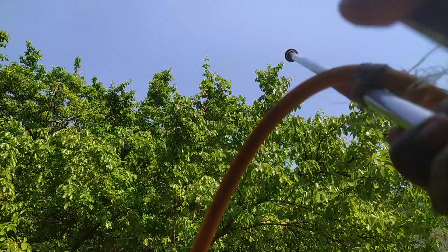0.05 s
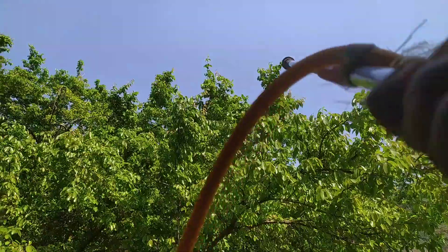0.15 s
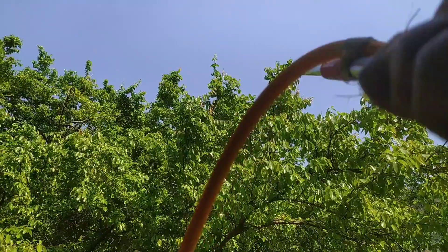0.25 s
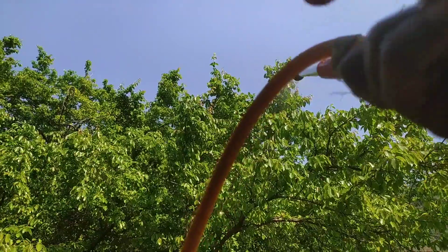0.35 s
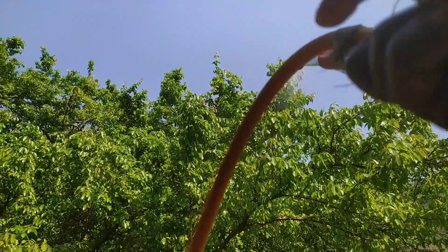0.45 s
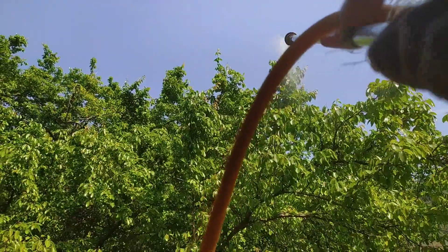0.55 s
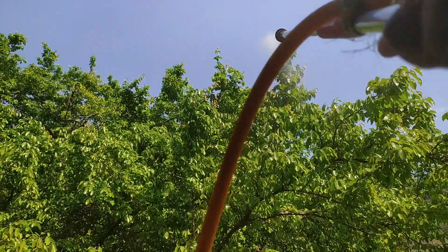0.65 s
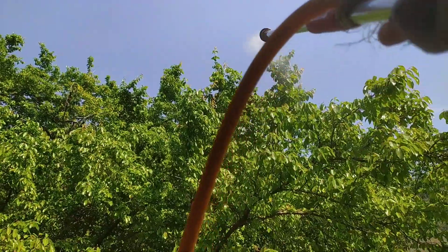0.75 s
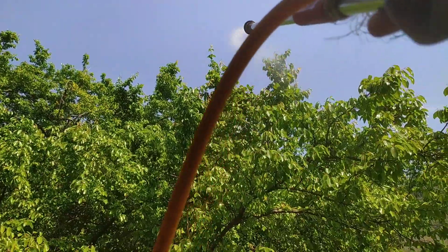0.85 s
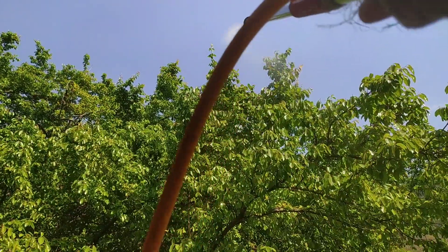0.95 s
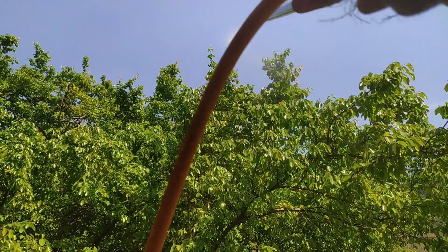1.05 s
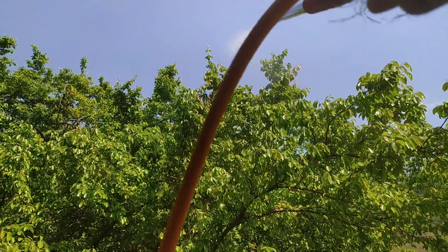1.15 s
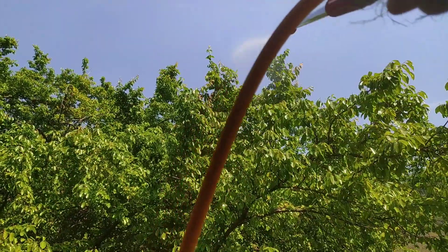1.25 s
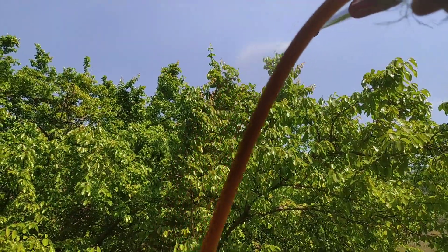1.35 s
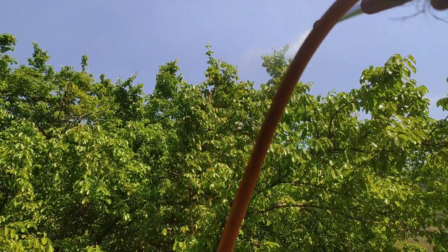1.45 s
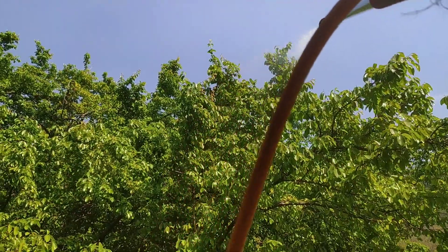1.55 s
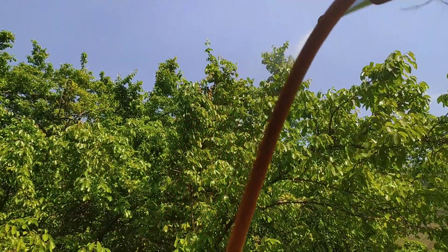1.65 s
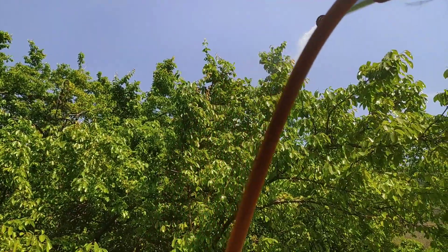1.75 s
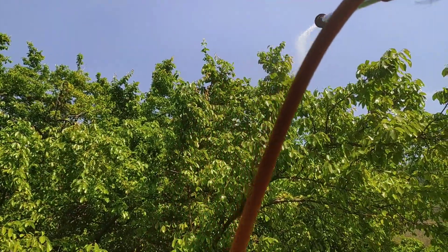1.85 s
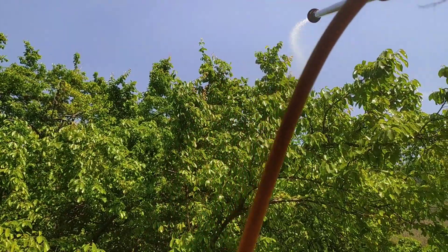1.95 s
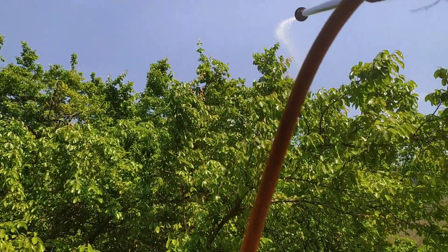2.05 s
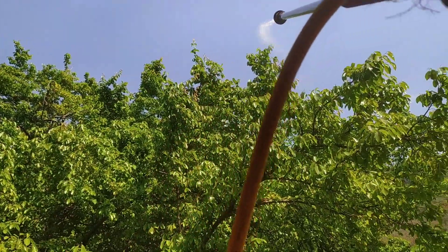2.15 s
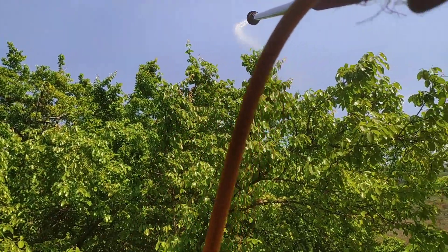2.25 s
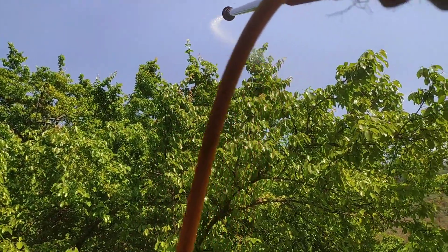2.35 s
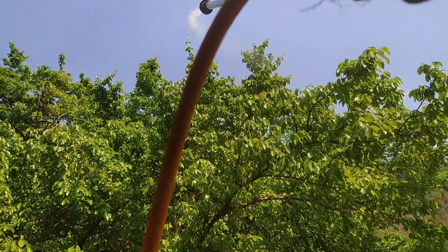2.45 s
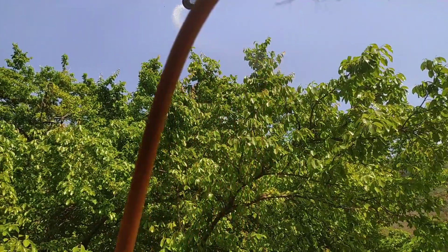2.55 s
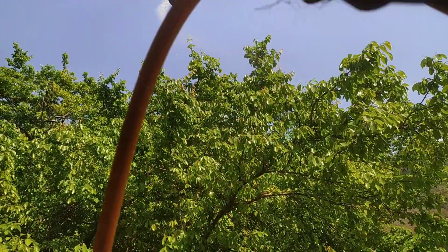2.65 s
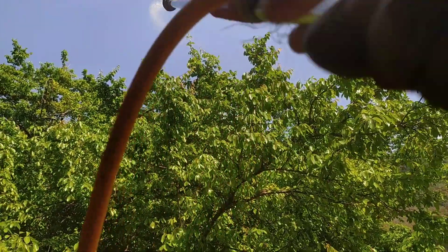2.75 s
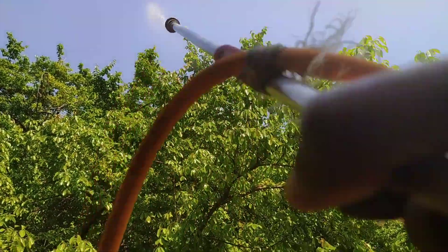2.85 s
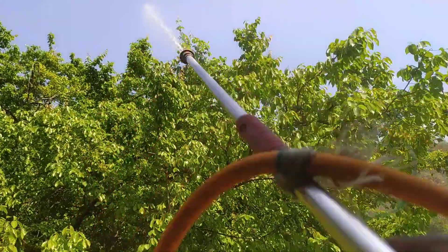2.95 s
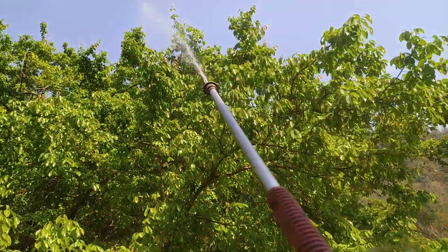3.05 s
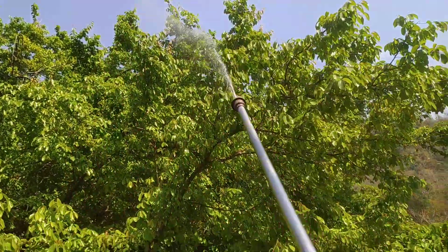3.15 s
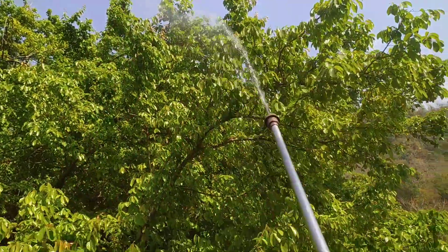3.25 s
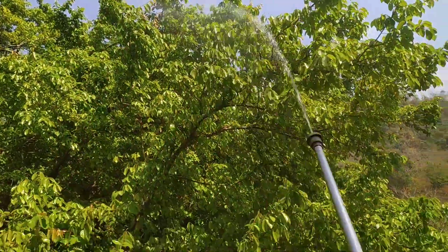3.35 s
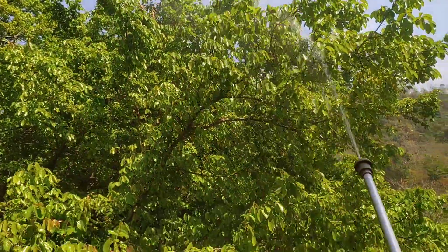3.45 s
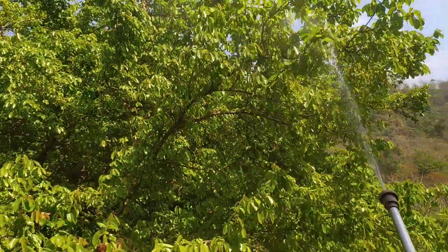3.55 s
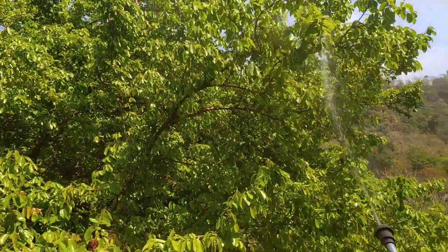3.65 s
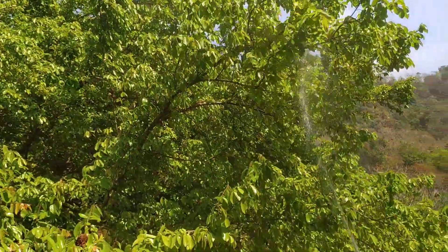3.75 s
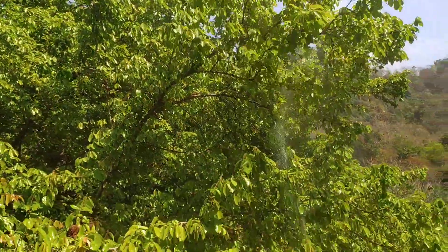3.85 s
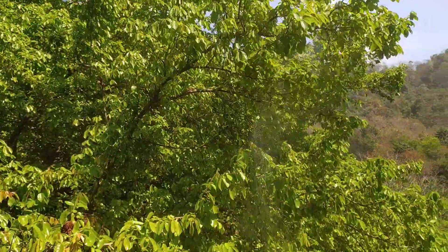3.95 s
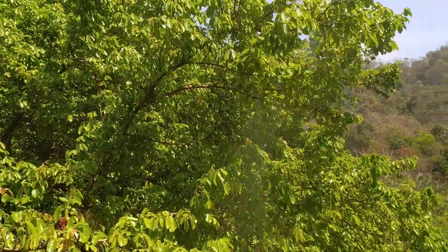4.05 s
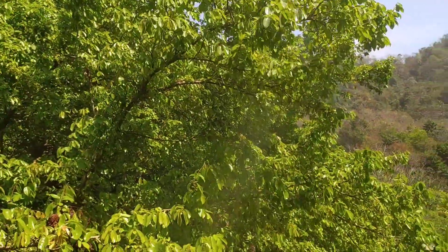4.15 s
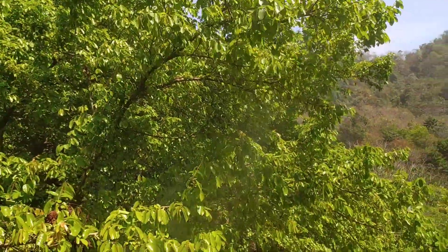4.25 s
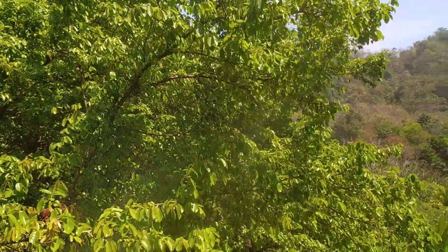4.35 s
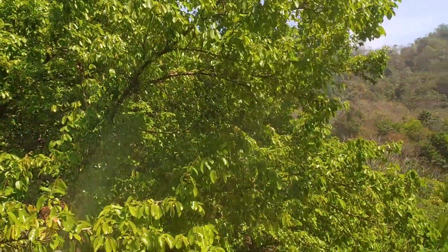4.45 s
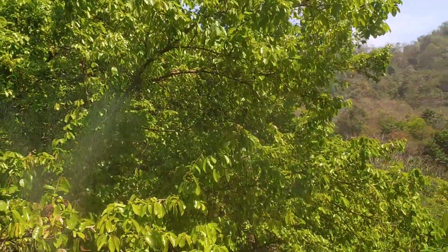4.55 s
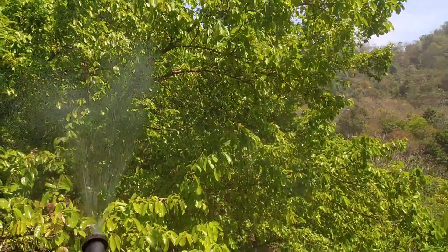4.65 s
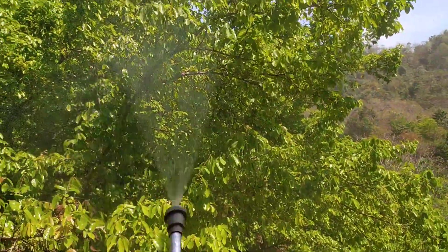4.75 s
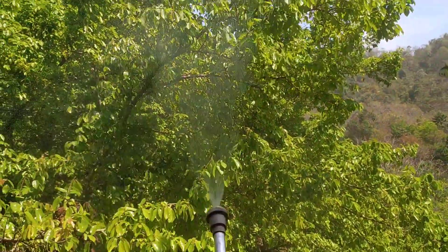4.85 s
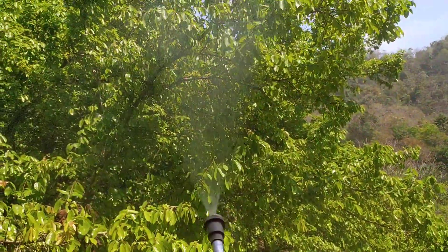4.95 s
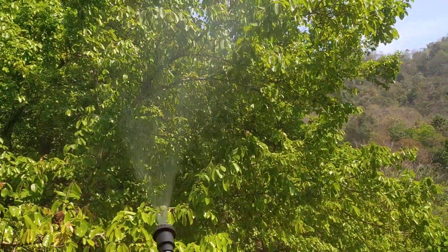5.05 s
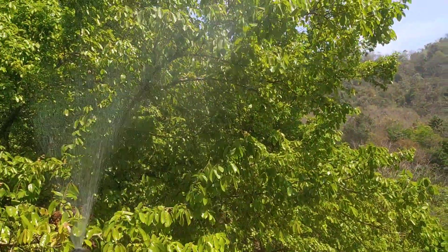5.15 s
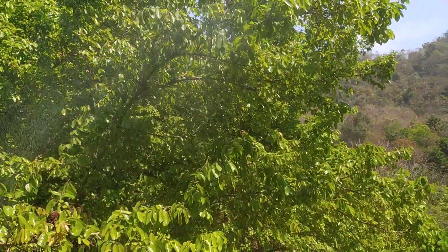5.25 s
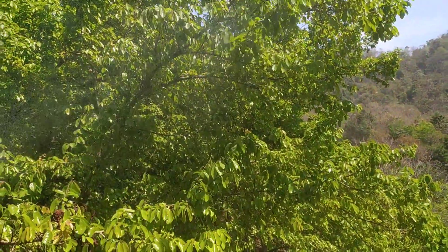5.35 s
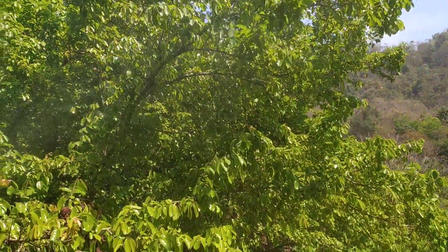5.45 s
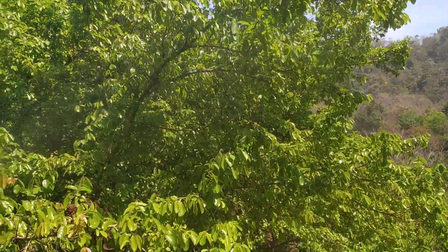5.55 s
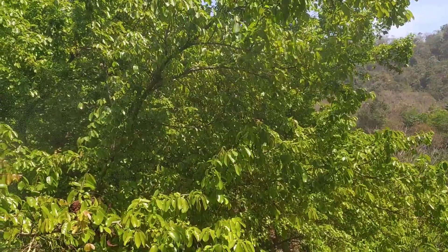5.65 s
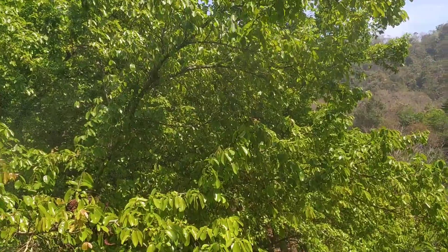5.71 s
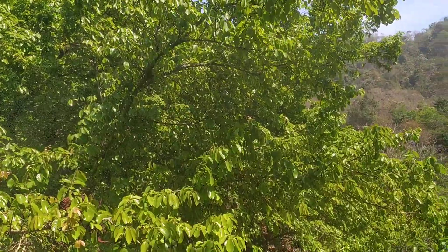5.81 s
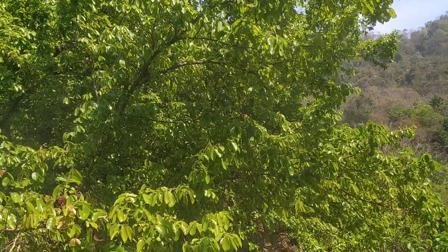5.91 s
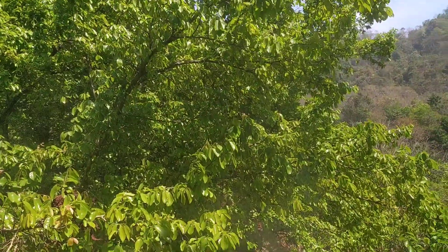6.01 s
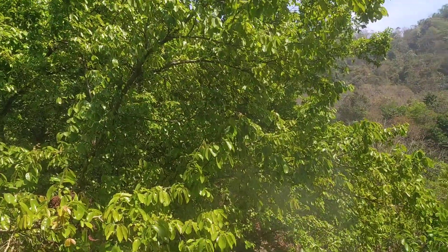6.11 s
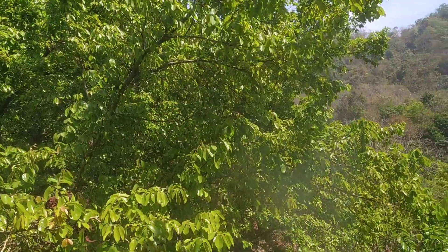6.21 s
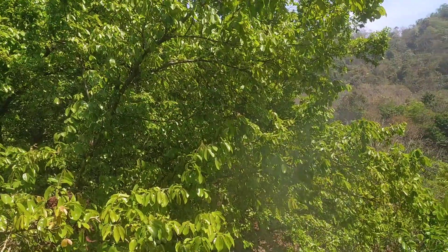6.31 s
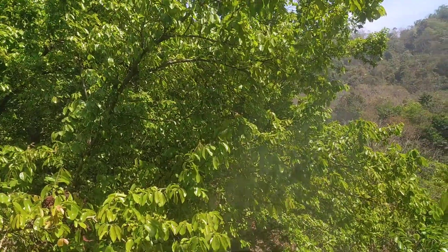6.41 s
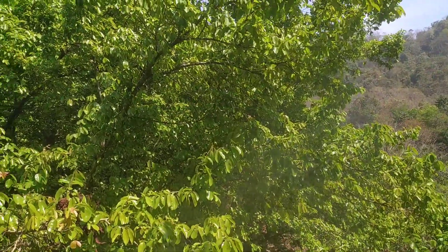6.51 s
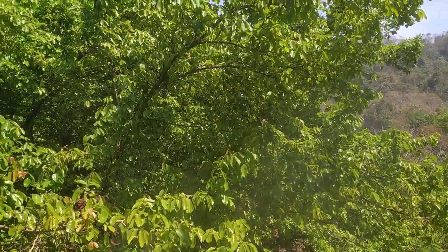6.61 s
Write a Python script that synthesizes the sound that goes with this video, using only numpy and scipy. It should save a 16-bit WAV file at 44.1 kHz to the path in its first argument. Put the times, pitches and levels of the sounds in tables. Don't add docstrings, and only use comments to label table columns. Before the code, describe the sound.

A pressure spray lance hisses and sputters outdoors among leafy trees, wavering side to side, then opens into a fuller, roaring mist near the end.

```python
import sys
import numpy as np
from scipy import signal
from scipy.fft import rfft, irfft, next_fast_len
from scipy.io import wavfile
from scipy.ndimage import uniform_filter1d

SR = 44100
rng = np.random.default_rng(int(sys.argv[2]) if len(sys.argv) > 2 else 0)


def invert_db(level):
    return 10 ** (np.asarray(level, dtype=float) / 20)


def generate_wav(signal):
    frames = np.transpose(np.atleast_2d(signal))
    scaled = np.clip(frames, -1, 1) * 32767
    pcm = np.round(scaled).astype(np.int16)
    wavfile.write(sys.argv[1], SR, pcm)


N = 294365
TIME_S = np.arange(N) / SR
HZ = np.fft.rfftfreq(next_fast_len(N), 1 / SR) + 1e-3

# time_s, gain_db
SCENE_CHANGE = [
    (0, 0),
    (.0257, 0),
    (.0262, -26),
    (.033, -26),
    (.038, -60),
    (.06, -60),
    (.074, 0),
    (6.7, 0),
]
# time_s, flow_db
VALVE = [
    (0, 0),
    (.05, -10),
    (.051, -41),
    (.1, -16.5),
    (.3, -10.5),
    (.33, -6.5),
    (.342, 2),
    (6.7, -0.5),
]
# time_s, left_port_lag_samples, clear_path_0_to_1.4 (past hand and hose)
SWING = [(.15, 4.1, 1), (.28, 3.2, 1), (.34, 4.5, .4), (.4, 5.4, 1.2), (.48, 4.8, 1.1), (.58, 5.8, .85),
         (.63, 4.8, .75), (.7, 3.7, .9), (.82, 3.5, 1.4), (.92, 2.9, 1), (1.05, 2.7, .9), (1.2, 3.1, 1.4),
         (1.3, 4, 1), (1.42, 4.7, 1), (1.6, 5.4, .8), (1.78, 5.3, .85), (1.86, 4.9, 1.3), (2.02, 4.9, 1.25),
         (2.1, 4.3, .85), (2.25, 3.5, 1.3), (2.35, 2.5, .9), (2.45, .7, 1), (2.9, -3, .5), (3.2, 1.5, .5),
         (3.4, 3.5, .7), (3.5, 3.9, .9), (3.58, 5.1, .95), (3.77, 5.1, .95), (3.87, 4, 1), (3.97, 4.5, .4),
         (4.1, 4, .4), (4.17, 3.2, .95), (4.26, .6, 1), (4.34, -.5, 1), (4.43, -3.2, .8), (4.52, -5, 1.25),
         (4.7, -5.3, 1.3), (4.82, 0, 1), (4.9, 2.7, 1.1), (5, 2.9, 1.25), (5.12, 0, 1), (5.21, -4.4, 1.25),
         (5.27, -6.8, 1.05), (5.4, -9.3, .85), (5.52, -9, 1.25), (5.61, -7.6, 1.3), (5.66, -5.2, .85),
         (5.73, -3.7, .9), (5.8, -.5, .9), (5.86, 2.7, .7), (5.93, 5.2, .75), (6, 6.4, .85),
         (6.1, 8.5, .75), (6.24, 8.3, .8), (6.32, 5.2, .95), (6.4, 4, 1.2), (6.45, 3, 1), (6.52, 0, 1.1)]
# time_s, hiss_db
NEARNESS = [(.34, -42.5), (1.0, -43.5), (1.25, -46.5), (1.5, -45), (1.75, -43.5), (2.3, -45), (2.7, -45),
            (3.1, -39.5), (3.3, -43.5), (3.38, -40.5), (3.41, -36.5), (3.95, -36.5), (4.6, -36.5),
            (5.1, -34), (5.3, -34), (5.5, -37.5), (5.8, -35), (6.67, -33.5)]
# time_s, rise_db, half_length_ms, extra_body_db, extra_mist_db
SURGES = [(0.363, 5.5, 54, 3.5, 10), (.422, 4, 28, 3, 20), (0.647, 4, 88, 6, -6), (1.69, -0.5, 53, 5, 5),
          (2.81, 1, 41, 2, 8), (3.431, 4.5, 48, 10, -8), (3.498, 6, 30, 11, -7), (3.593, 11.5, 90, 8.5, 7),
          (3.73, 8, 58, 7, -9), (3.83, 6, 67, 3.5, -4), (3.882, 7, 27, 0, 0), (4.03, -0.5, 73, 6, 7),
          (4.08, 1.5, 36, 4.5, 2), (5.49, -2.7, 110, 9.5, 5)]
# freq_hz, density_db
JET_COLOUR = [(180, -13), (300, -36), (502, -11.5), (900, -5), (3890, -8.5), (6850, -7.5), (8940, 2),
              (10400, -10), (15000, -16.5), (16000, -25)]
# time_s, peak_db, ring_hz, left_minus_right_db
KNOCKS = [
    (0.001, -45.5, 218, 26),
    (0.022, -42.5, 573, 28),
    (4.294, -35, 222, 25),
    (6.147, -42, 248, 28),
]
# time_s, peak_db,
# left_minus_right_db, length_ms, dull_share_0_1
SPITS = [(0.0255, -33, 3.5, 0.28, .5), (0.0303, -26, -3, 0.35, 0), (.122, -42.5, 8, 0.95, 0.5),
         (0.341, -24, -7, 1.15, 0.09), (.397, -33, 0, .6, 0.1), (.414, -27, -10, .6, 0.2),
         (0.602, -36, 0, .4, 0), (.626, -33, -4, 0.53, 0), (.954, -34, 0, 0.65, 0.2),
         (2.297, -31.5, 6, 0.78, 0), (2.715, -34.5, -11, 1.5, 0.7), (3.084, -32, 1, 0.82, 0),
         (3.4986, -24, -2, .8, 0.3), (3.528, -22, -4, .6, 0.1), (3.678, -28, 1.5, 1.2, 0),
         (3.8867, -23, 0, 0.6, 0), (4.0568, -19.5, -1.5, 1.1, 0.1), (4.0606, -29, -1, .4, .03),
         (4.0652, -25, -1, .25, 0.1), (4.0688, -24, -1, .5, .05), (4.072, -18, -5, 0.34, 0.05),
         (4.0805, -26, -3, .6, 0.2), (4.0916, -27, -3, .7, 0.1), (5.068, -30, 0, 0.55, .1),
         (5.284, -26, 4, 1.6, 0), (5.6644, -26, 6, 1.3, 0), (5.679, -20, 2.5, 0.48, 0.03),
         (5.6805, -17.5, 6, .5, 0), (6.096, -29, -1, .7, 0.2)]
# time_s, level_db
BREEZE = [(.3, -51.5), (.55, -60.5), (.7, -62.5), (2.2, -62.5), (2.42, -58.5), (2.6, -63), (5.0, -62.5),
          (6.67, -63)]
# freq_hz, drop_weaker_below_db (relative to the stronger)
WEAKER_DROP = [(300, -30), (500, -12), (1200, -10), (2200, -6.5), (3500, -6), (6500, -5.5), (8000, -9),
               (10000, -8), (12000, -6), (16000, -5)]

LAYER_EDGES_HZ = (450, 1100, 3200, 6700, 11200, 18000)
LAYER_DB = (-64, -60.5, -54.5, -46, -58.5)
USUAL_HISS_DB = -44
FOLLOW_DB_PER_DB = (0.49, 0.59, 1, 1, 0.89)
CONE_GAIN_DB = (8.4, 9.2, 0.7, 0.7, 5.1)
EARLIER_GAIN_DB = (16, 4, 4.5, -1.5, -13)
NARROW_DIRECT_0_1 = (.9, .3, .59, .52, .3)
CONE_DIRECT_0_1 = (.88, .6, .58, .54, .35)
CRACKLE_DB = (.5, .6, .8, 1.45, 1.9)
FLUTTER_DB = (0.87, 1, 0.68, 0.2, 0.38)

EARLIER_END_S = .038
PORT_HZ, PORT_WIDTH_HZ = 7200, 1200


def unit(x):
    return x / np.sqrt(np.mean(x ** 2, axis=-1, keepdims=True))


def curves(table):
    time_s, *columns = np.transpose(table)
    return [np.interp(TIME_S, time_s, column) for column in columns]


def shape(x, gain):
    size = next_fast_len(N)
    return irfft(rfft(x, size) * gain, size)[..., :N]


def band(lo_hz, hi_hz, order=4):
    low_side = 1 + (lo_hz / HZ) ** (2 * order)
    high_side = 1 + (HZ / hi_hz) ** (2 * order)
    return 1 / np.sqrt(low_side * high_side)


def walk(rate_hz):
    hold = max(int(SR / rate_hz), 2)
    levels = np.repeat(rng.standard_normal(N // hold + 1), hold)
    return unit(uniform_filter1d(uniform_filter1d(levels, hold), hold)[:N])


def sides(pan_db):
    return invert_db(np.array([pan_db, -pan_db]) / 2)


def bearing():
    wrist_s = .035
    return uniform_filter1d(curves(SWING)[0], size=int(wrist_s * SR))


def cone():
    opens_s, opening_s = 3.97, 0.13
    return np.clip((TIME_S - opens_s) / opening_s, 0, 1)


def colour():
    hz, db = np.transpose(JET_COLOUR)
    return invert_db(np.interp(np.log(HZ), np.log(hz), db))


def at_ports(x, detour=1, bounce_samples=0):
    late = bearing() * detour + bounce_samples * (1 - cone())
    fine = signal.resample_poly(x, up=4, down=1)
    left, right = (np.interp(4 * (np.arange(N) - side * late / 2), np.arange(4 * N), fine)
                   for side in (1, -1))
    ring = 1j * HZ * PORT_WIDTH_HZ
    turn = ring / (PORT_HZ ** 2 - HZ ** 2 + ring)
    detoured = shape(np.roll(left, 70), turn)
    return np.array([shape(left, 1 - turn) + detoured, right])


def layers_db():
    time_s, rise_db, half_ms, body_db, mist_db = np.transpose(SURGES)
    bumps = np.clip(1 - np.abs(TIME_S[:, None] - time_s) / half_ms * 1000, 0, 1)
    drive_db = curves(NEARNESS)[0] - USUAL_HISS_DB + bumps @ rise_db
    extra_db = (0, bumps @ body_db / 2, bumps @ body_db, 0, bumps @ mist_db)
    earlier = TIME_S < EARLIER_END_S
    levels = []
    for k, usual_db in enumerate(LAYER_DB):
        level_db = usual_db + FOLLOW_DB_PER_DB[k] * drive_db + extra_db[k] + curves(VALVE)[0]
        levels.append(level_db + CONE_GAIN_DB[k] * cone() + EARLIER_GAIN_DB[k] * earlier)
    return levels


def jet():
    clear_path = curves(SWING)[1]
    drops, flutter = walk(1500) + 0.072 * walk(200), walk(8)
    straight_low, straight_treble, scattered = np.zeros(N), np.zeros(N), np.zeros((2, N))
    for k, level_db in enumerate(layers_db()):
        lo_hz, hi_hz = LAYER_EDGES_HZ[k:k + 2]
        rough = invert_db(CRACKLE_DB[k] * (drops + walk(1500)))
        noise = unit(shape(rough * rng.standard_normal((3, N)), colour() * band(lo_hz, hi_hz)))
        noise = noise * invert_db(level_db + FLUTTER_DB[k] * (flutter + .5 * walk(22.13)))
        direct = NARROW_DIRECT_0_1[k] + (CONE_DIRECT_0_1[k] - NARROW_DIRECT_0_1[k]) * cone()
        share = np.clip(direct * clear_path, 0, .97)
        straight = straight_treble if lo_hz > 6000 else straight_low
        straight += np.sqrt(share) * noise[0]
        scattered += np.sqrt(1 - share) * noise[1:]
    treble = at_ports(straight_treble, detour=1.1, bounce_samples=4.5)
    pan_db = 0.04 + 12.5 * (TIME_S < EARLIER_END_S)
    heard = (at_ports(straight_low) + treble + scattered) * sides(pan_db)
    narrow_db, cone_db = 0.98, -0.34
    lean_db = bearing() * (narrow_db + (cone_db - narrow_db) * cone())
    hiss = shape(heard, band(LAYER_EDGES_HZ[3], LAYER_EDGES_HZ[4]))
    return heard + hiss * (sides(lean_db) - 1)


def knocks():
    out = np.zeros((2, N))
    t = np.arange(1024) / SR
    for time_s, peak_db, ring_hz, pan_db in KNOCKS:
        falling_hz = ring_hz * (1 + 6.04 * np.exp(-t / 0.00069))
        phase = 2 * np.pi * np.cumsum(falling_hz) / SR
        tap = invert_db(peak_db) * np.sin(phase) * np.exp(-t / 0.0045)
        i = int(time_s * SR)
        out[:, i:i + len(t)] += np.outer(sides(pan_db), tap)
    return out


def spits():
    out = np.zeros((2, N))
    t_ms = np.arange(1024) / SR * 1000
    bright_gain = colour() * band(8100, 13000, order=2)
    dull_gain = band(1000, 6500, order=2)
    for time_s, peak_db, pan_db, length_ms, dull in SPITS:
        burst = np.zeros(N)
        i = int(time_s * SR)
        envelope = t_ms / length_ms * np.exp(-t_ms / length_ms)
        burst[i:i + len(t_ms)] = rng.standard_normal(len(t_ms)) * envelope
        burst = (1 - dull) * unit(shape(burst, bright_gain)) + dull * unit(shape(burst, dull_gain))
        out += np.outer(sides(pan_db), burst * invert_db(peak_db + 3.0) / np.abs(burst).max())
    return np.array([at_ports(out[0])[0], at_ports(out[1])[1]])


def orchard():
    valve_db = curves(VALVE)[0]
    wind_db = -0.5 + curves(BREEZE)[0] + 0.8 * valve_db + 0.77 * walk(2.7)
    murmur_db = -61 + 0.03 * TIME_S + 1.18 * valve_db + 2.0 * walk(11)
    gusts = invert_db(np.array([2.0 * walk(18), 2.0 * walk(5.04)]))
    wind = unit(shape(rng.standard_normal((2, N)), band(12, 40, order=2))) * gusts
    noise = rng.standard_normal((3, N))
    murmur = unit(shape(noise[0] + 0.35 * noise[1:], band(193, 522, order=2))
                  + 0.11 * shape(noise[1:], band(60, 280)))
    return wind * invert_db(wind_db) + murmur * invert_db(murmur_db)


def joint_stereo(x):
    lead, group_bins = 253, 16
    pair = np.pad([x[0] + x[1], x[0] - x[1]], ((0, 0), (lead, 0))) / 2
    frames = dict(window="cosine", nperseg=2048, noverlap=1024)
    hz, _, spec = signal.stft(pair, SR, **frames)
    group = np.arange(len(hz)) // group_bins
    starts = np.arange(0, len(hz), group_bins)
    power = np.add.reduceat(np.abs(spec) ** 2, starts, axis=1)[:, group]
    limit = invert_db(2 * np.interp(hz, *np.transpose(WEAKER_DROP)))[:, None]
    kept = spec * (power >= limit * power[::-1])
    total, difference = signal.istft(kept, SR, **frames)[1][:, lead:lead + N]
    return np.array([total + difference, total - difference])


def scene():
    return jet() + knocks() + spits() + orchard()


def low_pass(x):
    return signal.sosfilt(signal.butter(12, 15830, fs=SR, output="sos"), x)


def record(dry):
    mix = joint_stereo(dry) * invert_db(curves(SCENE_CHANGE)[0])
    return low_pass(mix)


dry = scene()
out = record(dry)
generate_wav(out)
```